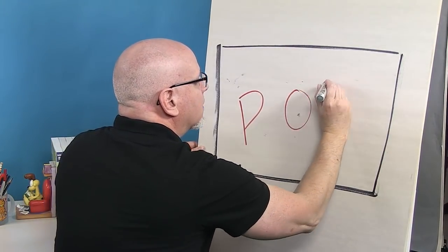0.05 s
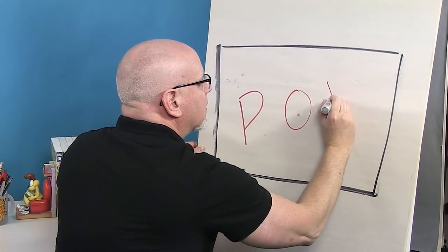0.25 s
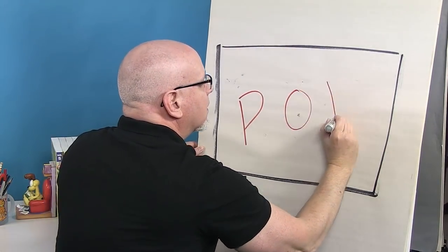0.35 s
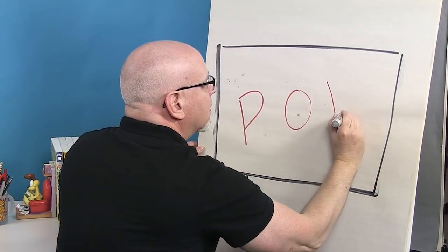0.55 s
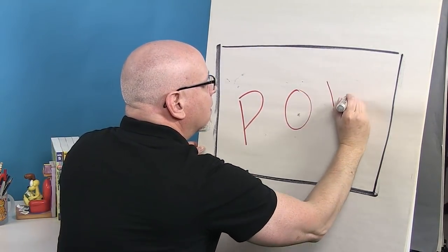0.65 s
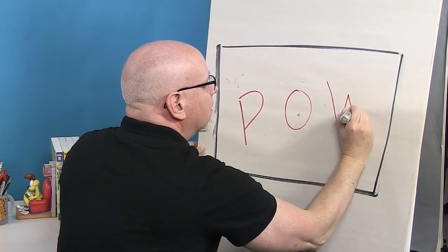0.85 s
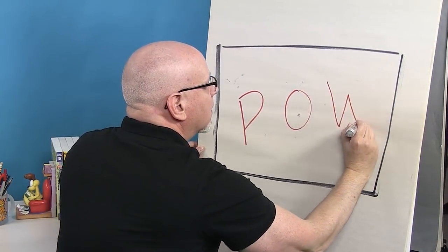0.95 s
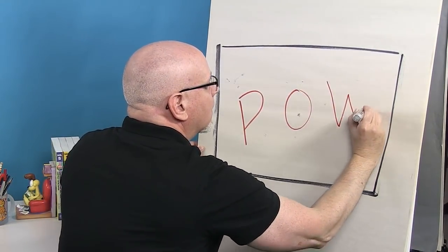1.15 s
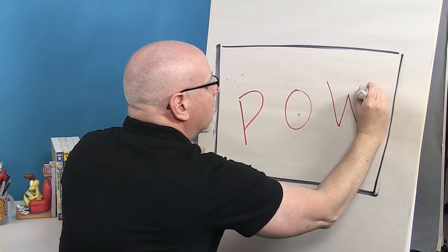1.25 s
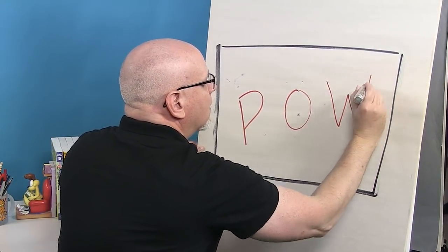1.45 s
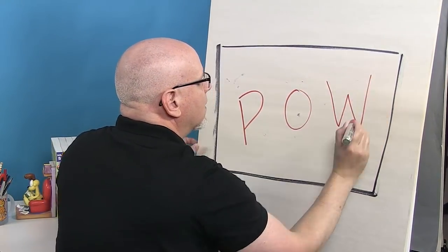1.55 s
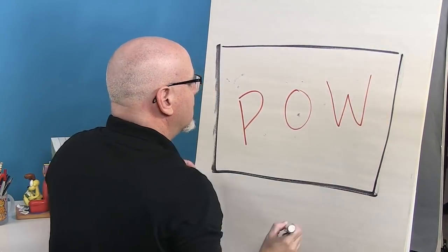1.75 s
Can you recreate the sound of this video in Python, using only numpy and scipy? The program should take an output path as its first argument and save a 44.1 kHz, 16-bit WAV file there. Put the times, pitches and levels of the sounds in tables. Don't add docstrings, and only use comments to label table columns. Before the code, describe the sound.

A felt-tip marker rasps four quick strokes on a big paper pad, the last upstroke loudest, with dull woody knocks late, then faint plastic ticks and a brush; close microphone, quiet room with low hum.

```python
import sys
import numpy as np
from scipy import signal
from scipy.fft import rfft, irfft
from scipy.io import wavfile
from scipy.ndimage import uniform_filter1d

SR = 44100
rng = np.random.default_rng(int(sys.argv[2]) if len(sys.argv) > 2 else 0)


def amplitude_ratio(level_db):
    exponent = np.asarray(level_db, float) / 20
    return 10 ** exponent


def waveform_to_disk(signal):
    frames = np.transpose(np.atleast_2d(signal))
    scaled = np.clip(frames, -1, 1) * 32767
    samples = np.round(scaled).astype(np.int16)
    wavfile.write(sys.argv[1], SR, samples)


N = 79380


def evened(x):
    return x / np.sqrt(np.mean(x ** 2) + 1e-20)


def read(points, hz):
    f, value = np.transpose(points)
    return np.interp(np.log(hz + 1), np.log(f + 1), value)


def add(mix, s, sound):
    part = mix[round(s * SR):][:len(sound)]
    part += sound[:len(part)]


def resonate(x, hz, width):
    turn = np.exp(2j * np.pi * np.cumsum(hz * np.ones(len(x))) / SR)
    r = np.exp(-np.pi * width / SR)
    smoothed = signal.lfilter([1 - r], [1, -r], x / turn + 1e-18)
    return 2 * (turn * smoothed).real


def drift(seconds):
    span = max(int(seconds * SR), 2)
    noise = rng.standard_normal(N)
    return evened(uniform_filter1d(uniform_filter1d(noise, span), span))


def air():
    # frequency in Hz, level in dB per Hz.
    tone_curve = [(18, -69), (30, -23), (117, -5.5), (145, -5), (424, -19), (522, -21.5), (661, -27.5),
                  (837, -27.5), (15800, -39)]
    # frequency in Hz, level in dB, width in Hz.
    hum_partials = [(121, -64.5, 18), (169.6, -66.5, 38), (228.6, -75.5, 14)]
    hz, t = np.fft.rfftfreq(N, 1 / SR), np.arange(N) / SR
    bass_cut_db = 26 * np.maximum(np.log2(45 / (hz + 1)), 0)
    colour = amplitude_ratio(read(tone_curve, hz) - bass_cut_db)
    wash = evened(irfft(rfft(rng.standard_normal(N)) * colour, N))
    swell_db = 0.5 * drift(0.05)
    hum = np.zeros(N)
    for f, db, width in hum_partials:
        hum += amplitude_ratio(db) * evened(resonate(resonate(rng.standard_normal(N), f, width), f, width))
    mains_hz, mains_db, _ = hum_partials[0]
    mains = 0.45 * amplitude_ratio(mains_db) * np.sin(2 * np.pi * mains_hz * t)
    return amplitude_ratio(-60 + swell_db) * wash + hum + mains


def stroke(rows, body):
    centre_hz, catches_per_s = 4300, 5000
    s, level_db, speed_db, press_db, main_hz = np.transpose(rows)
    t = np.arange(s[0], s[-1], 1 / SR)
    count = len(t)
    caught = rng.random(count) < catches_per_s / SR
    size_db = 3.5 * np.minimum(rng.exponential(1, count), 3.5)
    grain = rng.standard_normal(count)
    catches = np.sign(grain) * amplitude_ratio(size_db) * caught
    drive = evened(catches) + 0.54 * grain
    treble_lift_db, low_lift_db = np.interp(t, s, speed_db), np.interp(t, s, press_db)
    grip = np.interp(t, s, main_hz) / centre_hz
    out = np.zeros(count)
    for hz, width, db in body:
        octaves = np.log2(hz / centre_hz)
        lift_db = treble_lift_db * max(octaves, 0) + low_lift_db * np.clip(-octaves, 0, 1)
        bend = grip ** np.exp(-(octaves / 0.5) ** 2)
        f = hz * bend * (1 + 0.008 * drift(0.0029)[:count])
        shared = np.clip(1 + 0.11 * octaves, 0.2, 1.5) * drive
        ring = shared + 0.96 * rng.standard_normal(count)
        for _ in range(3):
            ring = resonate(ring, f, 2 * width)
        patch_db = 1.2 * drift(0.009)[:count]
        out += amplitude_ratio(db + lift_db + patch_db) * ring * np.sqrt(400 / width)
    hand_db = np.interp(t, s, level_db) + 7.0 + 0.38 * drift(0.009)[:count]
    return s[0], amplitude_ratio(hand_db) * out


def room(x):
    # frequency in Hz, decay time by 60 dB in seconds.
    decay_times = [(200, 0.35), (1000, 0.38), (3000, 0.41), (6000, 0.33), (12000, 0.2)]
    taps = np.zeros(SR // 2)
    at = np.arange(300, len(taps) - 20, 20)
    taps[at + rng.integers(0, 20, len(at))] = rng.choice([-1., 1.], len(at))
    hz, t, z = signal.stft(taps, SR, nperseg=256)
    decay = amplitude_ratio(-60 * t / read(decay_times, hz)[:, None])
    tail = signal.istft(z * decay, SR, nperseg=256)[1]
    return signal.fftconvolve(x, tail / np.linalg.norm(tail))[:N]


def knock(start, level_db, dull_db, length, crisp_db):
    # frequency in Hz, width in Hz, level in dB.
    wood_modes = [(236, 49, -5.5), (393.5, 26, 1.6), (564.5, 63, -3.5), (725, 120, -11.5), (966, 220, 1),
                  (1193, 210, -2.5), (1422, 65, -0.5)]
    # frequency in Hz, level in dB.
    slap_curve = [(150, -17), (350, 3.2), (1500, -0.5), (3000, -0.5), (5000, -7), (8000, -23.5),
                  (14000, -62)]
    knee_hz = 1570
    t, hz = np.arange(4096) / SR, np.fft.rfftfreq(4096, 1 / SR)
    fade_db = -1.5 * t / length - 1800 * np.maximum(t - length, 0)
    shape = np.minimum(t / 0.0028, 1) * amplitude_ratio(fade_db)
    rings = np.zeros(4096)
    for f, width, db in wood_modes:
        pure = np.sin(2 * np.pi * (f * t + rng.random()))
        rough = evened(resonate(rng.standard_normal(4096), f, width))
        rings += amplitude_ratio(db) * shape * (pure + 0.5 * rough)
    rings = rings / np.sqrt(np.mean(rings[:600] ** 2))
    dulling_db = dull_db * np.maximum(np.log2((hz + 1) / knee_hz), 0)
    colour = amplitude_ratio(read(slap_curve, hz) - dulling_db)
    slap = shape * evened(irfft(rfft(rng.standard_normal(4096)) * colour))
    return start, amplitude_ratio(level_db) * np.array([rings, amplitude_ratio(crisp_db) * slap])


def tick(start, level_db, low_hz, high_hz):
    width_hz = 130
    t = np.arange(600) / SR
    rings = np.sin(2 * np.pi * low_hz * t) + np.sin(2 * np.pi * high_hz * t)
    return start, amplitude_ratio(level_db) * np.exp(-np.pi * width_hz * t) * rings


def rustles():
    # centre in seconds, level in dB, spread in seconds.
    brushes = [
        (1.564, -63, 0.0075),
        (1.575, -53.5, 0.0016),
        (1.579, -61, .003),
    ]
    t = np.arange(N) / SR
    shape = sum(amplitude_ratio(db) * np.exp(-((t - s) / spread) ** 2) for s, db, spread in brushes)
    highpass = signal.butter(6, 7800, "high", fs=SR, output="sos")
    return shape * evened(signal.sosfilt(highpass, rng.standard_normal(N)))


def scene():
    # time in seconds, level in dB, speed as treble lift in dB,
    # pressure as low lift in dB, main ring in Hz.
    down_strokes = [
        [(.19, -102, -2, -1, 4200), (.202, -58, -5, 9, 4200), (.214, -47.5, -3.5, -1.5, 4170),
         (.258, -44, 1, -3, 4280), (.335, -46, 3.5, -1.5, 4150), (.36, -41.5, 2, -4, 4300),
         (.488, -43, 0.5, -4, 4190), (.516, -59.5, -1, 11, 4300), (.54, -100, -3, 2, 4350)],
        [(.815, -90, 0, 12, 4180), (.83, -43.5, -2, 1.5, 4000), (.865, -42.5, -1.5, -0.5, 4260),
         (.895, -44.5, 3.5, -2, 4200), (.952, -39, .3, -5, 4300), (1.055, -45.5, 1, -1, 4300),
         (1.09, -54, 0, 10, 4300), (1.108, -78, 2, 27, 4000), (1.12, -97, 0, 4, 4000)],
    ]
    up_strokes = [
        [(.542, -92, 0, 5, 3960), (.549, -65, -1, 5, 3980), (.554, -37, 0, 2, 4000), (.6, -38, 0.5, -0.5, 4190),
         (.66, -40, 0.5, 0, 4070), (.715, -38, 0, -0.5, 4270), (.77, -42.5, -9.5, 0.5, 3650),
         (.783, -72, -9, 21, 3650), (.8, -82, -5, 5, 3630)],
        [(1.124, -119, -9, 8, 3970), (1.131, -33, -1, -1, 3800), (1.173, -34.5, -3.5, 1.5, 4300),
         (1.228, -36.5, 2, -2.5, 4060), (1.261, -33, -2, -1, 4440), (1.322, -38, 2, 0.5, 3950),
         (1.38, -35, -5, -10, 4080), (1.412, -42, -9.5, -10, 4080), (1.44, -71, -8, 12, 4240)],
    ]
    # frequency in Hz, width in Hz, level in dB.
    stroke_bodies = [
        [(520, 130, -17), (1390, 750, -8.5), (2560, 550, -10), (3190, 540, -7), (4300, 1015, 4.1),
         (5600, 1100, -3), (6480, 830, -5.5), (9450, 730, -15), (11300, 1900, -19.5), (13800, 1800, -30)],
        [(550, 170, -20.5), (1560, 900, -17), (2270, 600, -9), (3510, 1100, -2), (4300, 860, 0.6),
         (5400, 760, -33), (7160, 730, -5.5), (9200, 1050, -13.5), (11400, 1200, -20), (13800, 1900, -28.5)],
        [(570, 180, -17.5), (1460, 540, -11), (2210, 730, -5.5), (3190, 490, -2), (4300, 1000, 4.5),
         (5400, 760, -13), (6700, 800, -5.5), (9220, 570, -12.5), (11400, 1400, -21.5), (13800, 2900, -31)],
        [(540, 114, -22.5), (1380, 1050, -22), (2270, 540, -11.5), (3010, 890, -3.5), (4300, 860, 1.9),
         (5350, 330, -16.5), (7100, 730, -5.5), (9200, 840, -13), (11100, 1100, -22.5), (14400, 2500, -30)],
    ]
    # start in seconds, level in dB, dullness in dB per octave above the knee,
    # burst length in seconds, crispness in dB.
    knock_rows = [
        (1.332, -33.5, 31, 0.011, -2),
        (1.509, -40, 2.5, 0.009, 3),
    ]
    # start in seconds, level in dB, low ring in Hz, high ring in Hz.
    tick_rows = [
        (1.452, -59, 3300, 5700),
        (1.465, -59, 3300, 5700),
        (1.480, -56, 1350, 3400),
        (1.479, -52, 190, 300),
        (1.574, -60, 8500, 12400),
    ]
    near, far, knock_send = rustles(), np.zeros(N), np.zeros(N)
    hand = [down_strokes[0], up_strokes[0], down_strokes[1], up_strokes[1]]
    for rows, body in zip(hand, stroke_bodies):
        add(near, *stroke(rows, body))
    for row in knock_rows:
        s, (rings, slap) = knock(*row)
        add(far, s, rings + slap)
        add(knock_send, s, amplitude_ratio(3.5) * slap + 0.25 * rings)
    for row in tick_rows:
        add(near, *tick(*row))
    echoes = room(amplitude_ratio(-26) * near + amplitude_ratio(-11) * knock_send)
    return (near + far + echoes + air())[None]


def band_limit(x):
    return signal.sosfilt(signal.butter(12, 15920, fs=SR, output="sos"), x)


def record(dry):
    hz = np.fft.rfftfreq(N, 1 / SR)
    bass_cut_db = 18 * np.maximum(np.log2(60 / (hz + 1)), 0)
    treble_cut_db = 6.0 * np.clip((hz - 14500) / 1400, 0, 1)
    colour = amplitude_ratio(-bass_cut_db - treble_cut_db) * (hz < 15900)
    return band_limit(irfft(rfft(dry) * colour, N))


dry = scene()
out = record(dry)
waveform_to_disk(out)
```